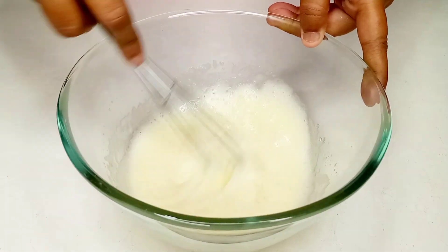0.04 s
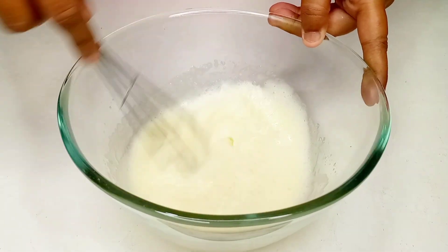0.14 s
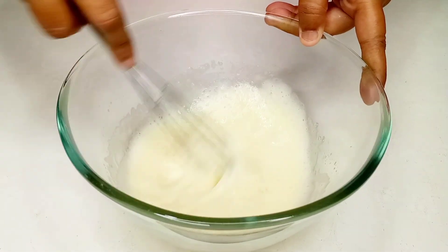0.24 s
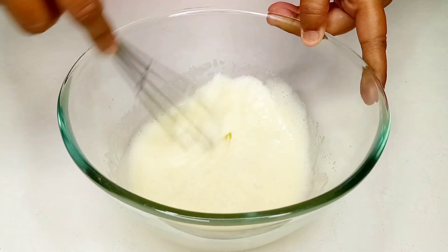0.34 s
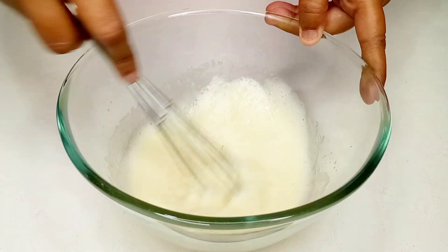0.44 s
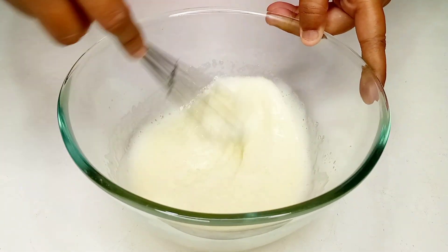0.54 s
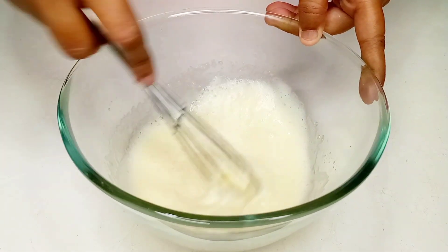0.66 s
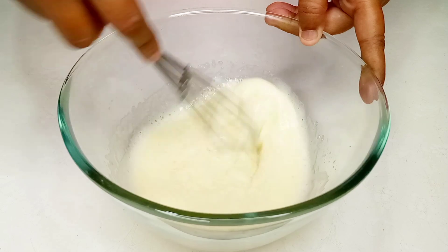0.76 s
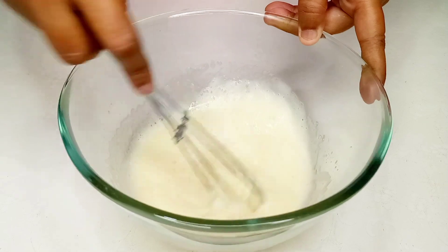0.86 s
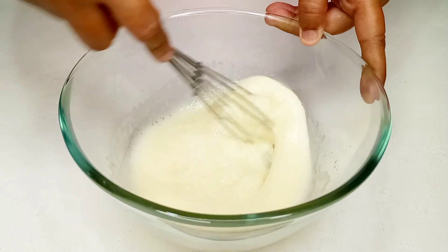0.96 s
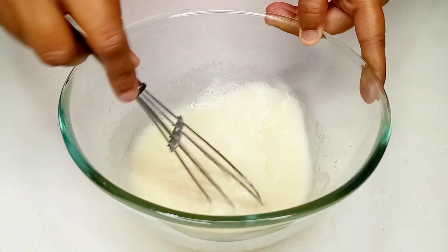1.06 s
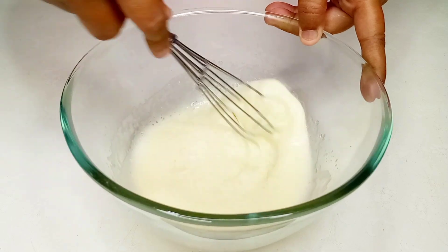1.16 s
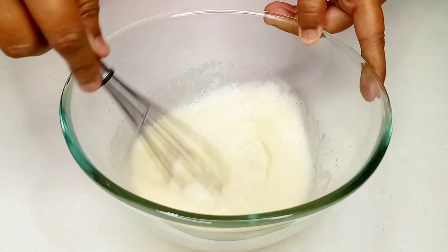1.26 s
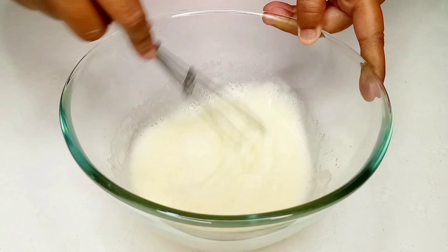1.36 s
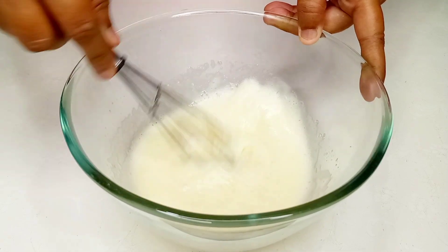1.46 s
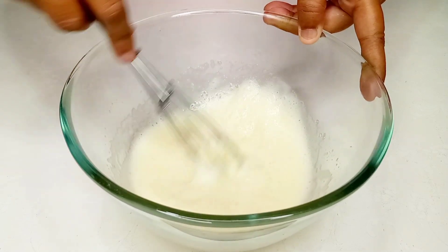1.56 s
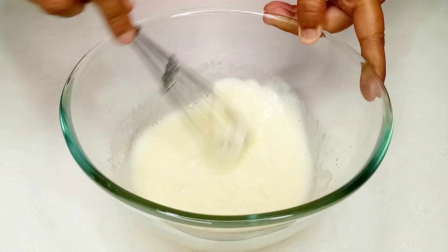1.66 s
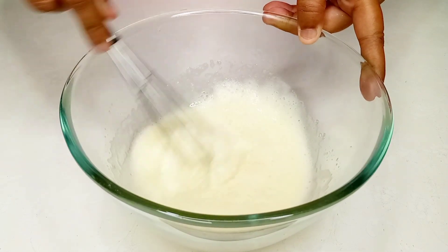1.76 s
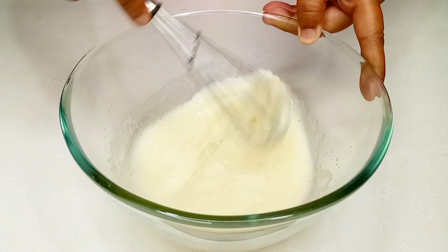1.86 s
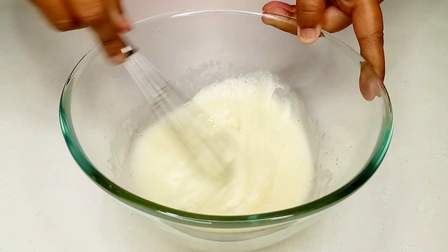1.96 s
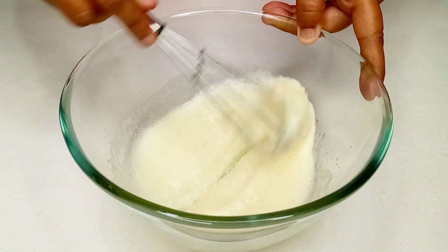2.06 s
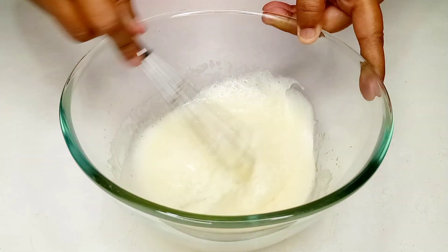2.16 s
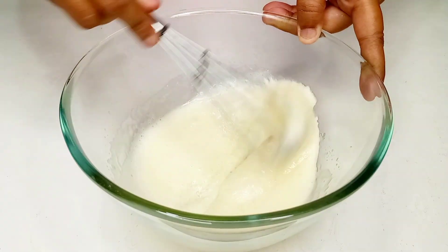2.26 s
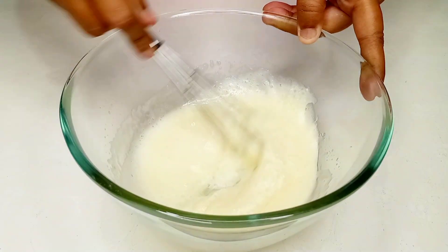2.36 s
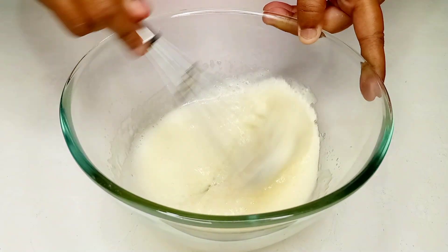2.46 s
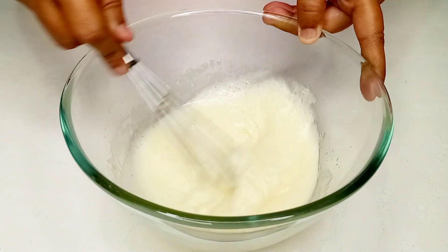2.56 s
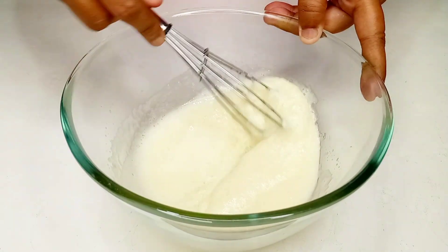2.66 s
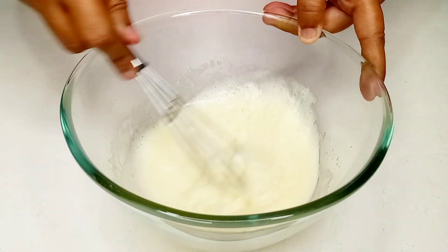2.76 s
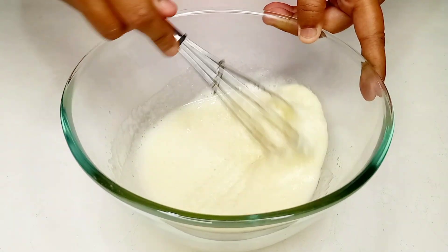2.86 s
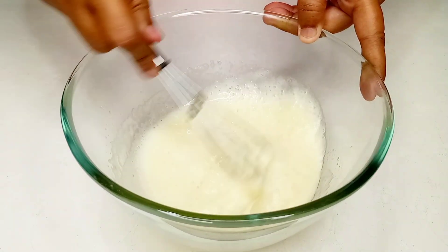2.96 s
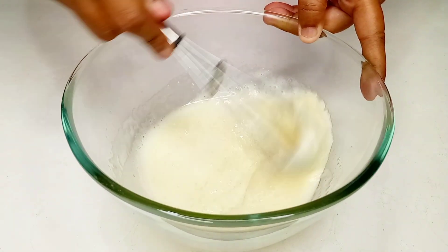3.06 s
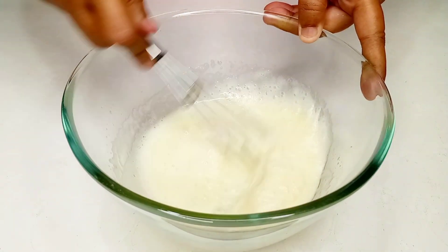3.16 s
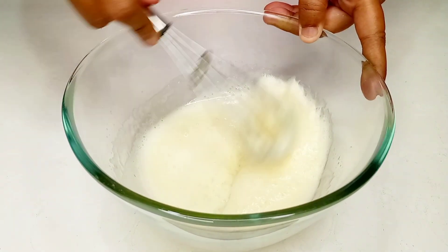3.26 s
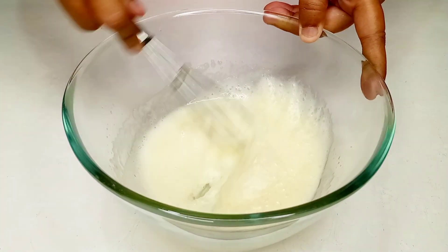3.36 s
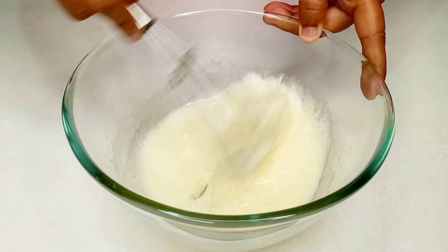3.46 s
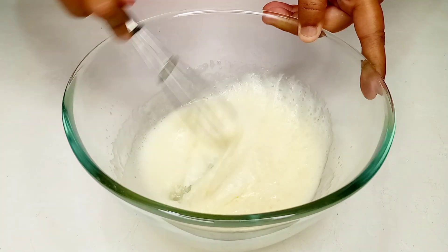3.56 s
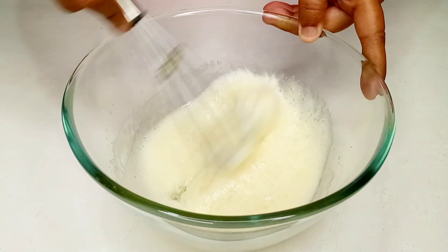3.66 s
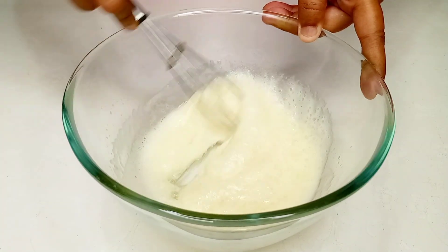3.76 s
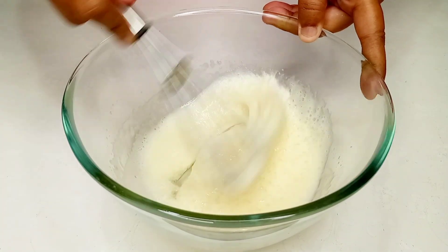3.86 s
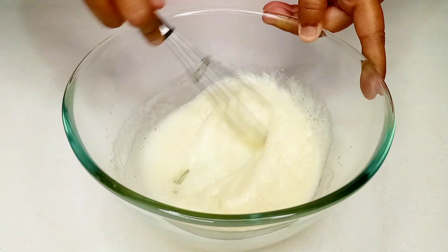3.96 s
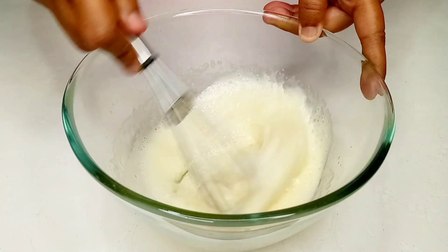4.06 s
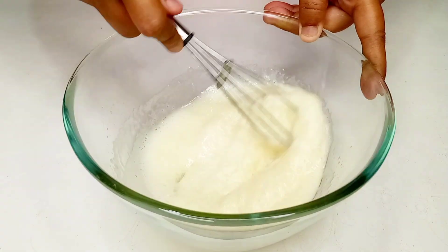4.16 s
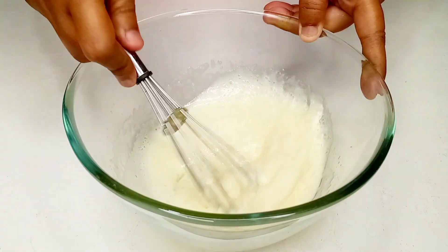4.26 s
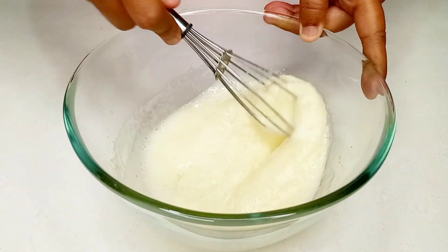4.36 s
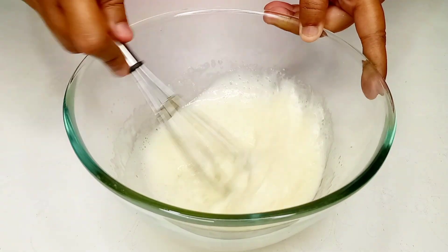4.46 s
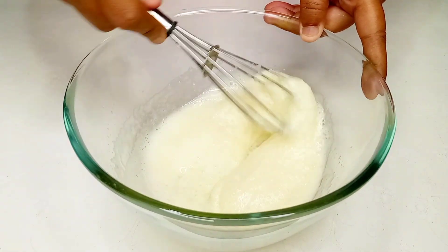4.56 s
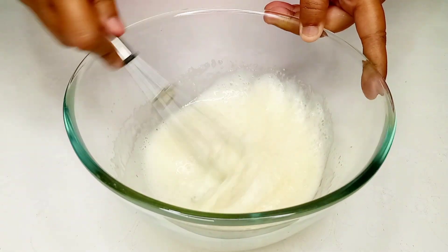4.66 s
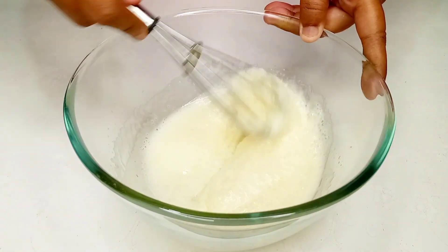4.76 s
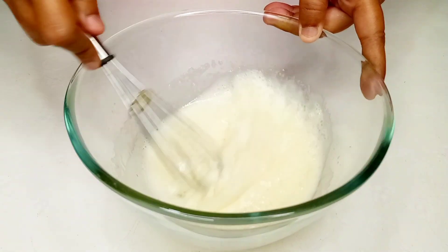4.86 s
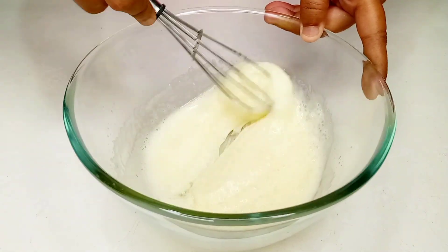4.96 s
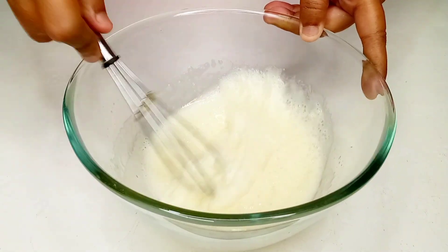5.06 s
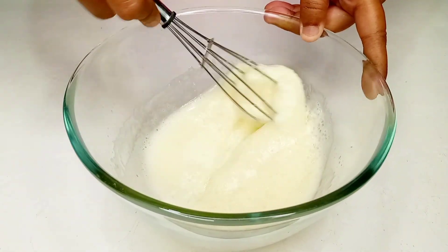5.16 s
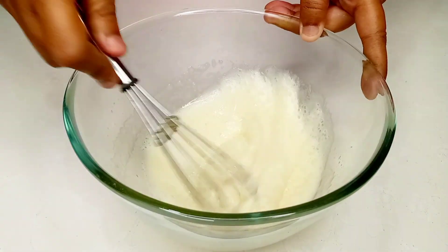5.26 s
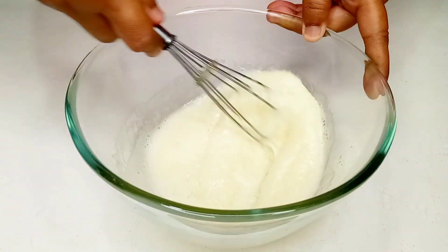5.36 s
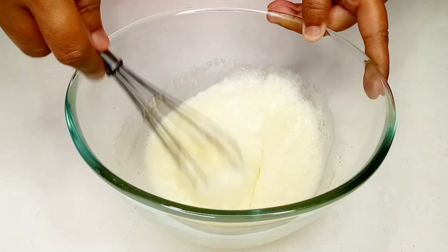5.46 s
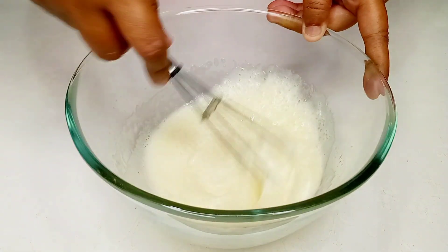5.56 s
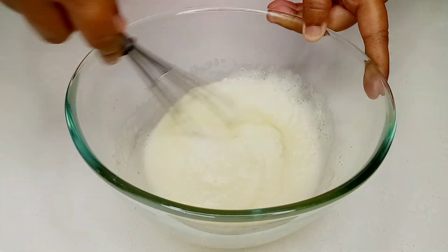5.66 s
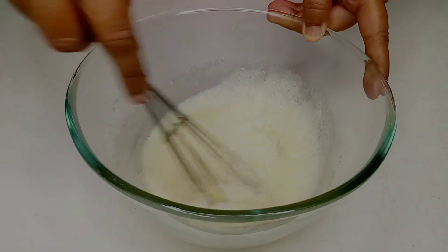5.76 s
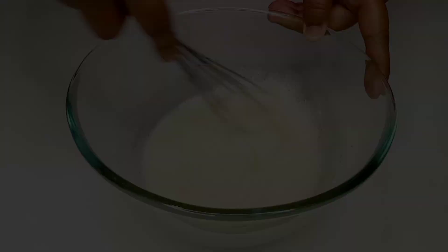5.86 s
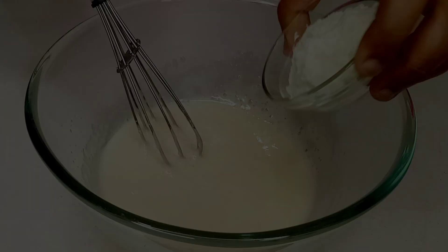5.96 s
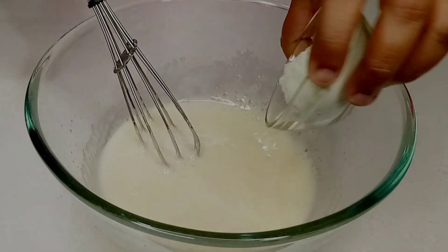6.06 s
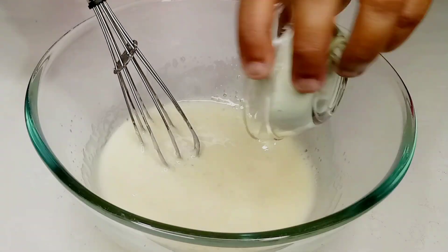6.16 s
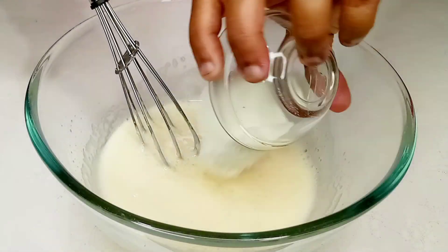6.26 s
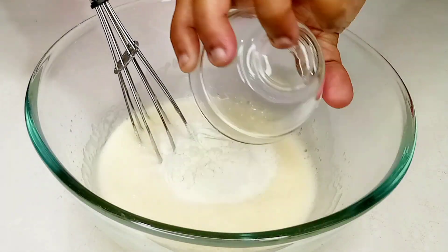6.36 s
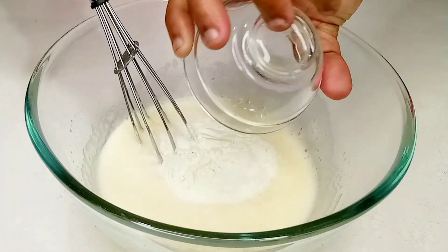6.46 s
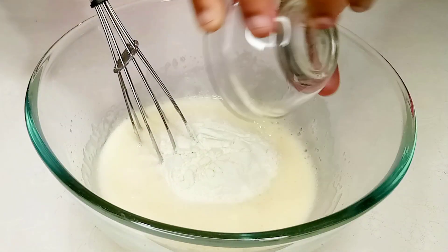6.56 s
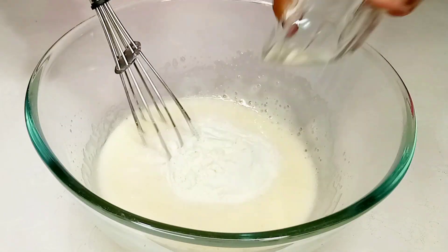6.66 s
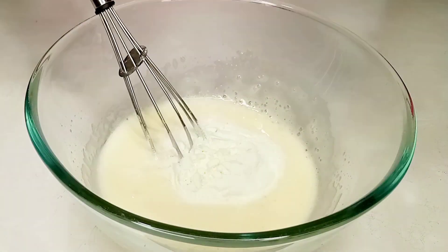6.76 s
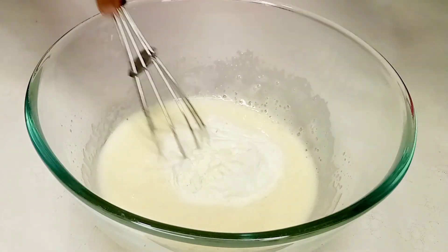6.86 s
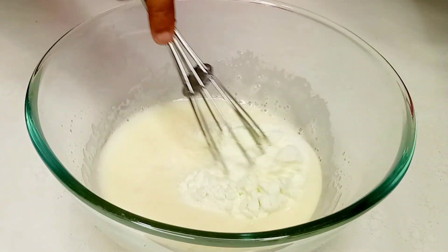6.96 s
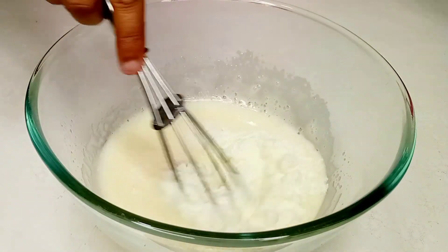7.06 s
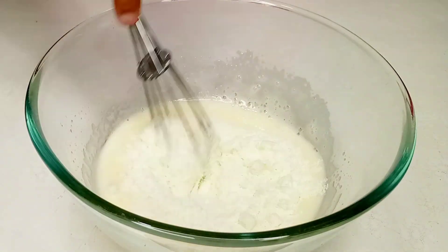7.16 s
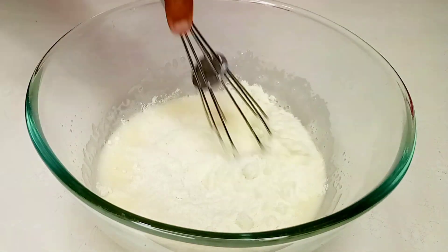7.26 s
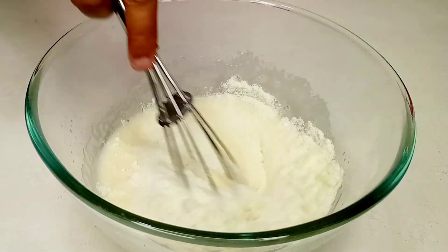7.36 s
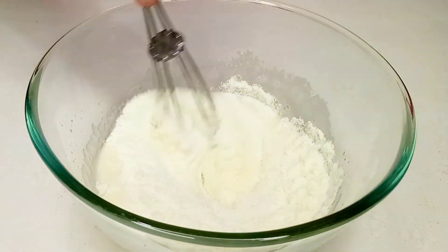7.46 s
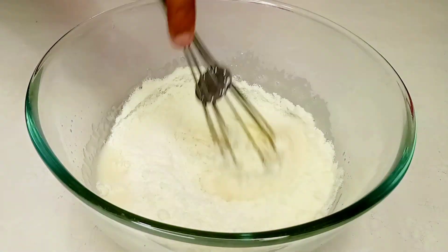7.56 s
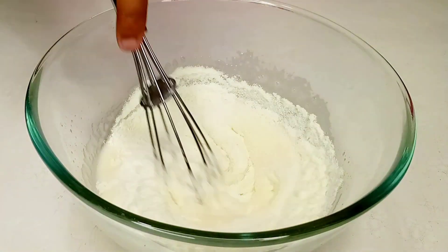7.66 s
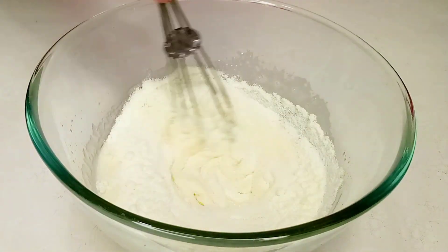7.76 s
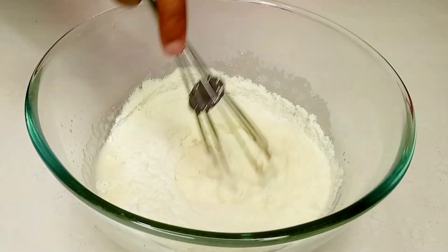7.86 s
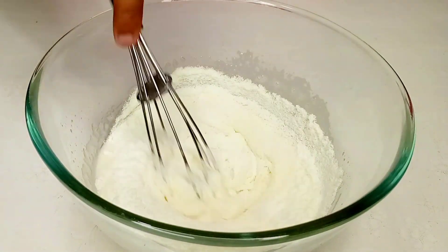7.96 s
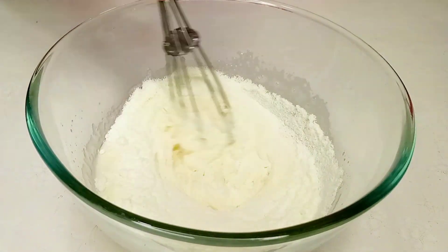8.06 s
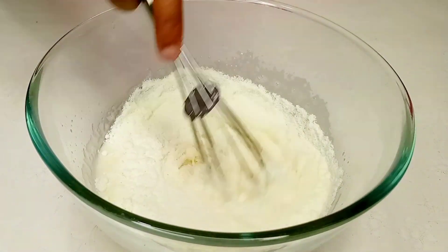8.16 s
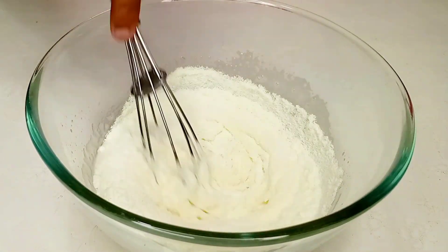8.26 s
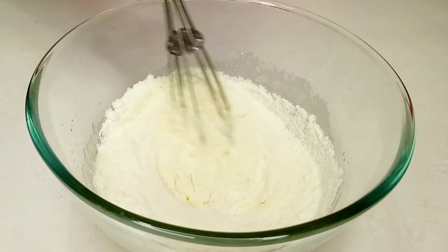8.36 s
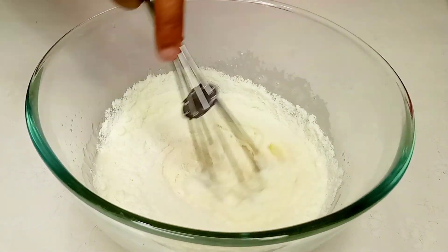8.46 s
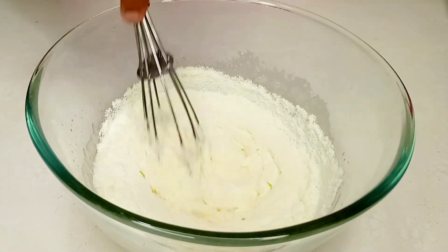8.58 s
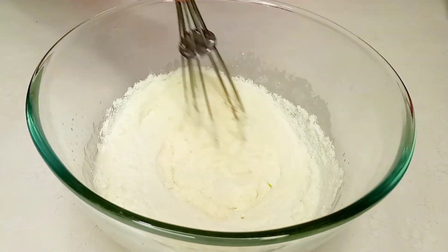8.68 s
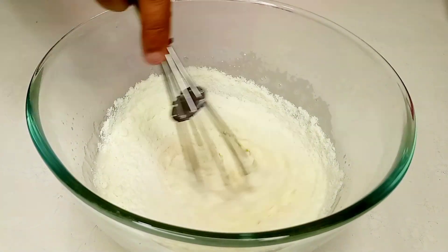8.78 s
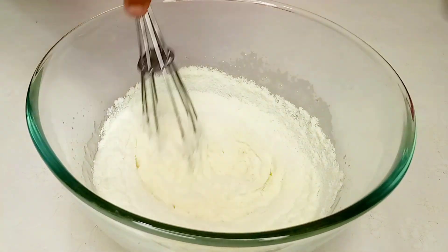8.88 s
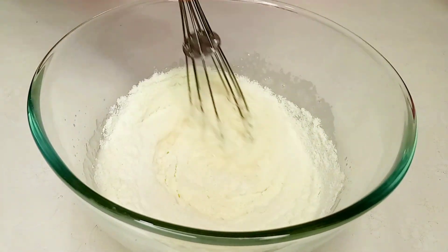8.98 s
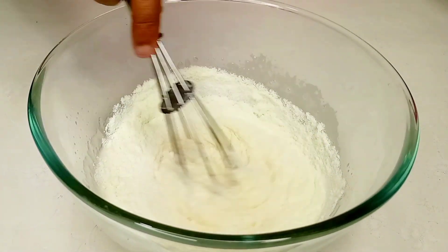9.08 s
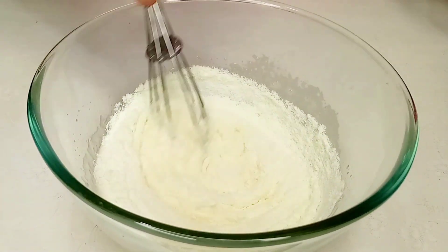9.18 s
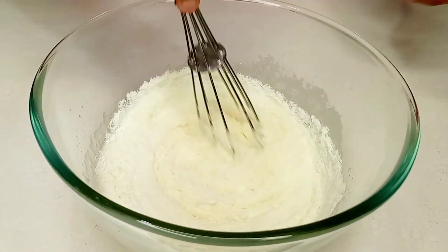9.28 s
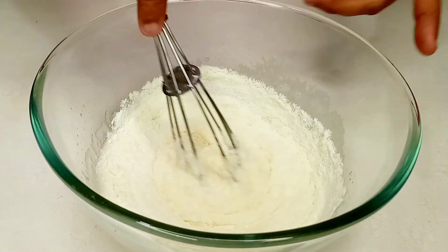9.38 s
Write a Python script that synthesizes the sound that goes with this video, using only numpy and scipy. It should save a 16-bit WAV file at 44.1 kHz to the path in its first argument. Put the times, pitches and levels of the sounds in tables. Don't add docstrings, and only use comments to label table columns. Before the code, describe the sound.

A wire whisk rattles round a glass bowl, then beats batter in steady sharp strokes, cuts to brief silence, and returns stirring softly through powder.

```python
import sys
import numpy as np
from scipy import signal
from scipy.fft import rfft, irfft
from scipy.io import wavfile

SR = 44100
rng = np.random.default_rng(int(sys.argv[2]) if len(sys.argv) > 2 else 0)


def how_loud(loudness_db):
    steps = np.asarray(loudness_db, float) / 20
    return 10 ** steps


def output_pcm(signal):
    pcm = np.clip(np.atleast_2d(signal).T, -1, 1) * 32767
    wavfile.write(sys.argv[1], SR, np.round(pcm).astype(np.int16))


N = 415422
TIME = np.arange(N) / SR
BEATING_START_S, STIRRING_START_S = 1.34, 6.18
STIRRING = TIME > STIRRING_START_S


def at_hz(points, hz):
    f, value = np.array(points).T[:2]
    return np.interp(np.log(hz), np.log(f), value)


def in_time(rows):
    s, *columns = np.transpose(rows)
    return [np.interp(TIME, s, column) for column in columns]


def rms_one(x):
    return x / np.sqrt(np.mean(x ** 2) + 1e-20)


def bandpass(x, low_hz, high_hz, order=2):
    return signal.sosfilt(signal.butter(order, [low_hz, high_hz], "band", fs=SR, output="sos"), x)


def highpass(x, hz, order):
    return signal.sosfilt(signal.butter(order, hz, "high", fs=SR, output="sos"), x)


def impulses(s, height):
    clicks = np.zeros(N)
    clicks[np.round(s * SR).astype(int)] = height
    return clicks


def drift(rate):
    r = np.exp(-80 * np.pi * rate / SR)
    noise = rng.standard_normal(N // 40 + 2002)
    slow = signal.lfilter([1], [1, -2 * r, r * r], noise)[2000:]
    return np.interp(np.arange(N) / 40, np.arange(len(slow)), rms_one(slow))


def ring(clicks, hz, t60):
    r, w = how_loud(-60 / (t60 * SR)), 2 * np.pi * hz / SR
    return signal.lfilter([0, np.sin(w)], [1, -2 * r * np.cos(w), r * r], clicks + 1e-18)


def coloured(x, spectrum):
    hz = np.maximum(np.fft.rfftfreq(2048, 1 / SR), 10)
    cepstrum = irfft(at_hz(spectrum, hz) * np.log(10) / 20)
    cepstrum[1:1024] *= 2
    cepstrum[1025:] = 0
    response = irfft(np.exp(rfft(cepstrum)))
    return signal.oaconvolve(x, response)[:len(x)]


def grains(per_s, spread_db):
    uneven = np.minimum(rng.exponential(1, N), 4)
    sizes = how_loud(spread_db * uneven) * rng.choice([-1, 1], N)
    return sizes * (rng.random(N) < per_s / SR)


def patchy(x, low_hz, count, patchy_db, rate):
    edges = low_hz * 2 ** (np.arange(count + 1) / 3)
    return sum(how_loud(patchy_db * drift(rate)) * bandpass(x, a, b) for a, b in zip(edges, edges[1:]))


def bursts(s, level_db, fall_s):
    t = np.arange(round(.15 * SR)) / SR
    out, chance = np.zeros(N + len(t)), rng.standard_normal((len(s), len(t)))
    for start, db, noise in zip(s, level_db, chance):
        run = noise * np.exp(-t / fall_s)
        i = round(start * SR)
        out[i:i + len(t)] += how_loud(db) * run / np.sqrt(np.sum(run ** 2))
    return out[:N]


def room_hiss():
    return how_loud(-96.5) * signal.lfilter([1], [1, -.9], rng.standard_normal(N))


# f/Hz, t60/s
KITCHEN_T60 = [(200, 0.23), (1000, 0.37), (4000, 0.1), (10000, 0.17), (16000, 0.055)]


def kitchen(x):
    t = np.arange(round(.5 * SR)) / SR
    noise, tail = rng.standard_normal(len(t)), 0
    for hz in 140 * 2 ** np.arange(7):
        band = bandpass(noise, hz, min(2 * hz, .45 * SR))
        tail = tail + band * how_loud(-60 * t / at_hz(KITCHEN_T60, np.sqrt(2) * hz))
    tail = tail * np.clip(t / 0.03, 0, 1)
    return signal.oaconvolve(x, tail / np.sqrt(np.sum(tail ** 2)))[:N]


# t/s, peak level/dB, thump level/dB, thin top/dB re peak
RATTLE = [(.002, -26, -28, -9), (0.0433, -47, -57, -20), (0.11, -46, -51, -10), (.772, -32, -31, 3),
          (1.0993, -42, -45, 3), (1.121, -53, -45, -26), (1.6102, -41.5, -43, -16),
          (0.0777, -30.5, -34, -17), (0.1263, -35, -32.5, 11), (0.145, -24, -26, 1.5),
          (0.2091, -27, -26.5, -17), (0.24, -30, -53, -20), (0.2931, -25, -32.5, -15), (0.348, -20, -26, 3),
          (0.4204, -25, -29.5, -1), (0.4351, -26, -33.5, -29), (0.5045, -51, -33.5, -23),
          (0.5245, -23, -29, -27), (0.5736, -25, -29, -4), (0.634, -26.5, -31, -26),
          (0.6805, -37, -29, -18), (.7112, -29, -39, -4), (0.841, -32.5, -36.5, -2),
          (0.874, -27, -33.5, -26), (0.934, -31, -35, -25), (0.964, -33, -59, -27), (0.987, -26, -29, 2.5),
          (1.048, -37, -55, -26), (1.158, -29, -34, -21), (1.1999, -20.5, -30, 2), (1.291, -24, -36.5, -45),
          (1.38, -31, -33.5, -27), (1.4361, -19, -24.5, -4), (1.5185, -30.5, -32.5, -26),
          (1.641, -42, -51, 2), (1.6702, -24, -37, 5.5)]
# t/s, peak level/dB, thump level/dB, brightest wire f/Hz, thin top/dB re peak
BEATS = [(1.7872, -21.5, -42, 4470, -26), (2.011, -20.5, -41, 3590, -9), (2.2041, -24.5, -29, 7200, -27),
         (2.4084, -14.5, -30.5, 3800, -28), (2.5933, -23, -27, 3660, -40), (2.7881, -20, -29.5, 7140, -44),
         (2.977, -23, -25.5, 4550, -26), (3.1613, -19, -29.5, 4500, -15), (3.3678, -13, -27.5, 6400, -17),
         (3.5566, -13.5, -24.5, 7460, -32), (3.7593, -8, -18.5, 3690, -37),
         (3.962, -12.5, -28.5, 3740, -23), (4.1479, -19.5, -33.5, 4700, -39),
         (4.3277, -17.5, -33, 4660, -33), (4.518, -14.5, -36, 7140, -14.5),
         (4.7072, -16.5, -33, 7140, -2.5), (4.8949, -15, -25, 7020, -4.5), (5.1001, -13.5, -31, 7300, -10),
         (5.2897, -11.5, -28.5, 3940, -30), (5.4812, -21, -30.5, 7000, 0), (5.641, -30, -35.5, 4500, 4)]
# t/s, peak level/dB, thump level/dB, thin top/dB re peak
GLANCES = [(2.0051, -36, -34, -1.5), (2.214, -20.5, -33, -26), (2.2728, -20, -49, 1.5),
           (2.463, -23, -39, -5), (2.581, -35, -45, -19), (2.6617, -24, -41, 1),
           (2.8547, -23.5, -38.5, -25), (3.03, -24, -51, -25), (3.049, -27.5, -36, -22),
           (3.2143, -26, -30, 1.5), (3.447, -27, -42, -21), (3.633, -22, -34, 1), (3.949, -41, -45, -21),
           (4.303, -43, -63, 2), (4.692, -58, -55, -13.5), (2.198, -34, -24, -14), (4.0196, -23.5, -34, -5),
           (4.2078, -25.5, -30, -27), (4.3886, -25.5, -35.5, 0), (4.583, -23, -25.5, -2),
           (4.7703, -18.5, -28.5, -1.5), (4.953, -16, -30, -22), (5.1677, -22.5, -31.5, 4.5),
           (5.371, -22.5, -29, -1), (5.553, -33, -40, -39), (5.6095, -36.5, -40, -2),
           (5.8022, -42, -48, -23), (5.8542, -39.5, -47, -14), (5.8884, -49, -57, -22.5)]
# t/s, peak level/dB, brightest wire f/Hz
TAPS = [(6.5296, -45, 7250), (6.576, -41, 3300), (6.6832, -42, 7250), (6.7276, -37, 3590),
        (6.9496, -45.5, 4430), (7.0194, -47, 7220), (7.2394, -48, 3820), (7.5433, -40.5, 7530),
        (8.1025, -55, 2590), (8.3958, -48.5, 4540), (8.9092, -43.5, 3180), (8.9885, -43, 3850),
        (9.0314, -42.5, 3730)]


def contacts_table():
    rattle = [(s, db, thump, top, thump - 16.5, 0) for s, db, thump, top in RATTLE]
    beats = [(s, db, thump, top, thump - 19.5, hz) for s, db, thump, hz, top in BEATS]
    glances = [(s, db, thump, top, thump - 22.5, 0) for s, db, thump, top in GLANCES]
    taps = [(s, db, db - 10.5, -6, db - 10.5 - 16, hz) for s, db, hz in TAPS]
    return np.array(rattle + beats + glances + taps)


# t/s, speed as hiss level/dB, pressure as rumble level/dB
BEATING = [(0, -62, -51.5), (.44, -52.5, -51), (1.0, -61, -53.5), (1.4, -55.5, -60), (1.78, -64, -77),
           (1.84, -48, -56.5), (2.0, -78, -70), (2.03, -60, -59), (2.48, -67.5, -63), (3.8, -61, -58),
           (5.2, -65, -55), (5.5, -63.5, -68), (5.75, -64.5, -87), (5.92, -100, -100)]
# t/s, length/s, speed as hiss level/dB, pressure as rumble level/dB
STIRS = [(6.05, 0.16, -90.5, -87), (6.174, 0.069, -67, -62), (6.236, 0.13, -93, -62.5),
         (6.276, 0.5, -66.5, -73.5), (6.48, 0.52, -61, -62.5), (6.727, 0.74, -62, -78),
         (6.97, 0.25, -78, -63.5), (7.148, 0.3, -61, -71), (7.265, 1, -68.5, -91),
         (7.531, 0.15, -61.5, -47.5), (7.634, 0.45, -69.5, -54), (7.826, 0.15, -67, -51),
         (7.935, 0.2, -69, -63), (8.037, 0.32, -64.5, -67), (8.24, 0.36, -71, -84.5),
         (8.357, 0.45, -65.5, -67.5), (8.631, 0.27, -69.5, -65.5), (8.906, 0.4, -59.5, -62.5),
         (9.15, 0.5, -61, -66.5)]


def hand():
    power = how_loud(2 * np.array(in_time(BEATING)))
    power = power + how_loud(2 * np.array([[-81], [-76]])) * STIRRING
    for s, length, *db in STIRS:
        u = (TIME - s) / length
        swell = np.clip(np.minimum(u / 0.19, (1 - u) / 0.6), 0, 1)
        power = power + how_loud(2 * np.array(db))[:, None] * swell ** 2
    speed_db, pressure_db = 10 * np.log10(power)
    phase = np.searchsorted([BEATING_START_S, STIRRING_START_S], TIME)
    rocking_db = pressure_db + np.array([-1, 2, -6])[phase]
    rocking_db = np.where(STIRRING, np.minimum(rocking_db, -75.5), rocking_db)
    return speed_db, pressure_db, rocking_db


def shaken(steady_db, strike_db, rise_s, t60, stop_s):
    kicks = impulses(contacts_table()[:, 0], how_loud(2 * strike_db))
    t = np.arange(round(.4 * SR)) / SR
    shudder = (1 - np.exp(-t / rise_s)) * how_loud(-120 * t / t60) * np.exp(-(t / stop_s) ** 3)
    return np.sqrt(how_loud(2 * steady_db) + np.maximum(signal.oaconvolve(kicks, shudder)[:N], 0))


# f/Hz, level/dB, t60/s
COUNTER = [(96, 2, 1), (127, 15, 0.12), (165.3, -0.5, 1), (225, -36.5, 0.067)]


def counter_boom():
    rocking = grains(200, spread_db=-5.0)
    boom = sum(how_loud(db) * ring(rocking, hz, 0.53 * t60) for hz, db, t60 in COUNTER)
    return bandpass(rms_one(boom), 55, 300)


# f/Hz, level/dB re pressure, t60/s
STIR_MODES = [(356, -3.5, 0.08), (521.4, -2.5, 0.064), (628.6, -4.5, 0.066)]


def bowl_rumble(coarse):
    rumble = bowl(coarse, damping=0.47, slosh_db=19.0, low_db=2)
    rumble = rms_one(patchy(rumble, 202.1, count=10, patchy_db=2.6, rate=10.5))
    circling = np.clip((BEATING_START_S - TIME) / 0.16, 0, 1)
    rumble = rumble + how_loud(0.5) * circling * rms_one(ring(coarse, 304.7, 0.12))
    grind = sum(how_loud(db) * rms_one(ring(coarse, hz, t60)) for hz, db, t60 in STIR_MODES)
    return np.where(STIRRING, how_loud(-4) * rumble + grind, rumble)


# f/Hz, width/Hz, level/dB
WIRES = [(3485, 52, 4.5), (4940, 180, -2), (4920, 130, 0), (6030, 41, -1), (7260, 30, 2), (7400, 27, 4.5),
         (7530, 150, -6.5), (8740, 28, -10.5), (9480, 230, 1)]
# f/Hz, level/dB per Hz
HISS = [(590, -37), (1000, -9.5), (1700, -21), (2600, -11.5), (4200, -1), (5700, -8), (7200, -0.5),
        (9500, -8.5), (11800, -16), (13600, -16), (14900, -18), (16000, -12.5)]
# f/Hz, level/dB per Hz
POWDER = [(530, -26), (900, -10.5), (1410, -9), (1900, -13.5), (2900, -10), (3700, -5.5), (4400, -0.5),
          (5300, -12.5), (6300, -3.5), (8450, -4.5), (11800, -22), (16000, -20.5)]


def wire_hiss(fine):
    wires = sum(how_loud(db + 4 * drift(8)) * rms_one(ring(fine, hz, 2.2 / width)) for hz, width, db in WIRES)
    scrape = np.where(STIRRING, rms_one(coloured(fine, POWDER)), rms_one(coloured(fine, HISS)))
    patchy_db = np.where(STIRRING, 1.7, 1.5)
    swish = patchy(scrape, 1000, count=12, patchy_db=patchy_db, rate=14)
    wires_db = -9.0 - 9 * STIRRING
    hiss = rms_one(rms_one(swish) + how_loud(wires_db) * rms_one(wires))
    loose_wires = rms_one(coloured(grains(210, spread_db=1.5), CRACK))
    return hiss + how_loud(-8.0) * loose_wires


def drag():
    hiss_db, rumble_db, boom_db = hand()
    _, peak_db, thump_db, top_db, thud_db, _ = contacts_table().T
    fine = rms_one(grains(15000, spread_db=2.5)) * how_loud(1.3 * drift(21))
    coarse = rms_one(grains(3000, spread_db=4.0)) * how_loud(2.1 * drift(6.3))
    tips = rms_one(bandpass(fine, 14300, 15800))
    splash = rms_one(bandpass(coarse, 750, 2840))

    shudder_db = np.minimum(peak_db, -13) - 21.0
    hiss_gain = shaken(hiss_db - .5, shudder_db, rise_s=0.0025, t60=0.3, stop_s=0.24)
    tips_db = hiss_db - 32.0 + 5.0 * drift(12)
    tips_gain = shaken(tips_db, peak_db + top_db - 30.5, rise_s=.002, t60=0.067, stop_s=.07)
    rumble_gain = shaken(rumble_db - .5, thump_db - 10.0, rise_s=0.032, t60=0.32, stop_s=0.11)
    splash_gain = shaken(rumble_db - 21.0, thump_db - 20.5, rise_s=0.0058, t60=0.2, stop_s=0.057)
    boom_gain = shaken(boom_db - .5, thud_db - 0.5, rise_s=0.0036, t60=0.44, stop_s=0.39)
    return (hiss_gain * wire_hiss(fine) + tips_gain * tips + rumble_gain * bowl_rumble(coarse)
            + splash_gain * splash + boom_gain * counter_boom())


# t/s, peak level/dB, f/Hz
TICKS = [(6.07, -69.5, 7230), (6.151, -72, 4400), (6.18, -46, 1240), (6.188, -46, 1430),
         (6.189, -48.5, 4500), (6.189, -55, 7200), (6.41, -53, 8500), (7.544, -46, 1520),
         (7.548, -50, 2280), (8.412, -53, 5900), (8.53, -59, 6700), (8.66, -49, 7500), (8.705, -57, 3660),
         (8.91, -57, 3150), (8.909, -52, 4200), (9.045, -54, 3520)]


def ticks():
    out = np.zeros(N)
    t = np.arange(64) / SR
    for s, db, hz in TICKS:
        click = np.zeros(4096)
        click[:64] = how_loud(db) * np.hanning(64) / 16 * np.sin(2 * np.pi * hz * t)
        out[round(s * SR):][:len(click)] += ring(click, hz, 68 / hz)
    return out


# f/Hz, level/dB, t60/s
GLASS = [(3779, -5, .17), (3735, -9, .07), (3830, -10, .06), (1374, -1, .3), (1520, -10, .2),
         (2457, -9, .38), (2436, -8, .12), (2490, -7, .07), (5400, -1, .2), (11600, -13, .13),
         (7820, -9, .12)]
# [1: 3.8, 2: 1.4, 3: 2.5, 4: 5.4, 5: 7.8 kHz]
DRIVEN_BY = [1, 1, 1, 2, 2, 3, 3, 3, 4, 4, 5]
# t/s, level/dB of the 3.8, 2.5 and 7.8 kHz modes
CLINKS = [
    (0.3512, -54, -37, -48),
    (2.2736, -52, -47, -47),
    (2.464, -48, -38, -48),
    (2.6845, -43, -60, -50),
    (3.558, -42, -47, -37.5),
    (5.2904, -28, -44, -22),
    (3.7594, -15.5, -28.5, -47.5),
]
# t/s, peak level/dB, sharpness/dB on its two top modes, 2.5 kHz mode/dB re peak
DISH = [
    (6.0693, -70.5, 4.5, -11),
    (6.151, -68, -16, -17),
    (6.188, -52, 3, -11),
    (6.199, -73, 3, 9.5),
    (6.3114, -73, -14, 2),
    (6.401, -78, -13, 14),
    (6.728, -53, -4, -6),
]
DISH_MODES_DB = [-11, -6, -1, -12, -15]


def rim():
    held = np.array([(s, a, a - 24, b, a - 22, c) for s, a, b, c in CLINKS])
    free = []
    for s, db, sharp_db, mid_db in DISH:
        modes_db = db + np.array(DISH_MODES_DB)
        modes_db[3:] += sharp_db
        modes_db[2] += mid_db
        free.append((s, *modes_db))
    free = np.array(free, float)
    out = np.zeros(N)
    for (hz, db, t60), column in zip(GLASS, DRIVEN_BY):
        bowl_clicks = impulses(held[:, 0], how_loud(held[:, column] + db))
        dish_clicks = impulses(free[:, 0], how_loud(free[:, column] + db))
        ringing = ring(bowl_clicks, hz, t60) + ring(dish_clicks, hz, 1.54 * t60)
        out += ringing * how_loud(2.5 * drift(70))
    return out


# t/s, level/dB of two counter modes and the two lowest bowl modes
SEATINGS = [(0.144, -53, -63, -49, -62), (0.344, -47, -50, -53, -45), (0.984, -55, -47, -47, -49),
            (1.198, -59, -63, -48.5, -51.5), (1.437, -40, -49, -60, -58), (1.67, -68, -59, -52, -71),
            (1.785, -45, -75, -57.5, -56), (2.011, -45, -48, -59, -48.5), (2.203, -39.5, -57, -49, -55),
            (2.408, -37.5, -50.5, -41, -46), (2.594, -51, -49, -50, -59), (2.658, -53, -45.5, -46, -62),
            (2.79, -50, -48, -62, -44), (2.854, -61, -57, -50.5, -45.5), (2.975, -67, -51, -54, -58.5),
            (3.16, -39.5, -46, -44.5, -45), (3.212, -62, -53, -66, -61.5), (3.364, -43, -53.5, -60.5, -54),
            (3.555, -49, -56, -42.5, -47.5), (3.63, -63, -52, -45.5, -56), (3.76, -53, -50, -42.5, -29.5),
            (3.961, -35, -43, -42, -52), (4.146, -37, -58, -56, -49), (4.207, -37, -48.5, -61, -46),
            (4.325, -39, -45, -50, -51), (4.517, -49, -73, -58, -46), (4.584, -44, -70, -44, -46),
            (4.707, -37.5, -71, -49, -40), (4.77, -42.5, -64, -55, -52.5),
            (4.894, -34.5, -47, -31.5, -33.5), (5.104, -35, -50, -53, -43), (5.164, -52, -45.5, -47, -50.5),
            (5.289, -41, -40, -44, -56), (5.37, -49, -42, -46.5, -47), (5.481, -60, -50, -58, -48)]
STIR_SEATINGS = [(6.182, -64, -75, -64, -63), (6.528, -78, -87, -69, -74), (6.727, -74, -60, -58, -59),
                 (6.997, -79, -75, -64, -76), (7.235, -74, -76, -79, -63), (7.541, -62, -60, -72, -53),
                 (7.834, -81, -74, -71, -58), (7.949, -78, -77, -80, -61.5), (8.097, -86, -85, -67, -54.5),
                 (8.414, -67, -65, -70, -83), (8.71, -74, -66, -65, -75), (8.911, -55, -63, -59, -72),
                 (9.034, -59, -70, -58, -78), (9.198, -78, -76, -61.5, -75)]
SEAT_HZ, SEAT_T60_S = [93, 166, 299, 361], [.33, .33, .24, .16]
SEAT_DB = [-2, 1, 6, 5.5]


def seatings():
    rows, out = np.array(SEATINGS + STIR_SEATINGS), np.zeros(N)
    push = np.hanning(round(0.024 * SR))
    t = np.arange(len(push)) / SR
    for k, (hz, db, t60) in enumerate(zip(SEAT_HZ, SEAT_DB, SEAT_T60_S)):
        clicks = impulses(rows[:, 0], how_loud(rows[:, k + 1] + db))
        swell = signal.oaconvolve(ring(clicks, hz, t60), push * np.cos(2 * np.pi * hz * t))
        out += 2 * swell[:N] / push.sum() * how_loud(2.8 * drift(17))
    return out


# f/Hz, level/dB, t60/s
BOWL = [(299, -4, 0.22), (362, -7, 0.15), (421, -11, 0.19), (523.7, 8, 0.11), (582.7, 1, 0.091),
        (634, -8.5, 0.11), (753, -5.5, 0.09), (922, -9, 0.13), (1016, -10, 0.11), (1120, -6, 0.05)]


def bowl(push, damping, slosh_db, low_db):
    modes = sum(how_loud(db + low_db * (hz < 400)) * ring(push, hz, damping * t60) for hz, db, t60 in BOWL)
    slap = bandpass(push, 270, 1100)
    return highpass(modes + how_loud(slosh_db) * slap, 230, order=4)


# t/s, peak level/dB, upper body/dB re peak
KNOCKS = [(3.768, -27.5, 10), (4.906, -18.5, -12), (6.187, -48, 6), (6.727, -32, -4), (7.0, -63, -13),
          (7.235, -62, -25), (8.415, -62, -5), (8.7, -54, -25), (9.27, -46, -25), (7.316, -55, -30),
          (7.543, -29.5, -5.5), (7.835, -38.5, -3.5), (7.88, -44, -4), (7.93, -49, -22), (8.1, -43.5, -3),
          (8.912, -43, -29), (8.989, -44, 0.5), (9.035, -43.5, -0.5), (9.409, -42, -18)]


def bottom_knocks():
    s, db, upper_db = np.transpose(KNOCKS)
    low = bowl(bursts(s, db - 15.0, fall_s=.014), damping=1.0, slosh_db=10, low_db=-3)
    upper = bursts(s, db + upper_db + 26.5, fall_s=.016)
    return low + bandpass(upper, 650, 1650, order=3)


# t/s, peak level/dB
BLOW_KNOCKS = [(0.144, -43), (0.293, -51), (0.347, -63), (0.421, -35), (0.573, -50), (0.683, -43.5),
               (0.984, -32), (1.197, -66), (1.435, -32), (1.674, -33.5), (1.787, -35.5), (2.012, -33.5),
               (2.214, -41), (2.271, -35.5), (2.409, -27), (2.595, -27.5), (2.658, -53), (2.788, -39.5),
               (2.978, -59), (3.161, -32), (3.365, -28), (3.555, -29.5), (3.631, -45), (3.756, -31),
               (3.964, -27), (4.149, -30), (4.325, -30.5), (4.521, -28), (4.704, -29), (4.897, -57),
               (5.099, -34), (5.289, -40), (5.37, -31.5), (5.481, -34.5)]
STIR_KNOCKS = [(6.528, -59), (6.728, -42), (6.999, -62), (7.234, -53.5), (7.319, -46), (7.544, -38.5),
               (7.695, -58), (7.834, -44), (7.879, -51), (8.101, -50), (8.414, -62), (8.697, -69),
               (8.749, -62), (8.912, -45.5), (8.988, -50), (9.269, -62)]
# f/Hz, level/dB, t60/s
KNOCK_MODES = [(526, 0, 0.2), (521, -12, 0.12), (596, -8.5, 0.15)]


def blow_knocks():
    s, db = np.array(BLOW_KNOCKS + STIR_KNOCKS).T
    clicks = impulses(s + .003, how_loud(db - 4.0))
    soft = signal.lfilter(np.hanning(40) / 20, 1, clicks)
    return sum(how_loud(db + 2.5 * drift(35)) * ring(soft, hz, t60) for hz, db, t60 in KNOCK_MODES)


def thump():
    s, _, thump_db = contacts_table().T[:3]
    push = bursts(s + 0.001045, thump_db - 16.5, fall_s=.006)
    return bowl(push, damping=0.82, slosh_db=37, low_db=-6.5)


# f/Hz, level/dB per Hz
CRACK = [(410, -37.5), (700, 4.5), (1770, -10), (3600, 1.5), (5920, -3.5), (7110, 2.5), (7690, -5.5),
         (8310, -2), (13700, -22), (15000, 2), (16000, -30.5)]
BRIGHT_HZ = [3660, 4500, 4700, 7630, 7140]


def cracks(fall_s, wire_t60, wire_db):
    lead_s = .03
    t = np.arange(round(.08 * SR)) / SR - lead_s
    rows = contacts_table()
    out, chance = np.zeros(N + 2 * len(t)), rng.standard_normal((len(rows), len(t)))
    any_wire = rng.choice(BRIGHT_HZ, len(rows))
    for (s, db, _, top_db, _, hz), noise, other in zip(rows, chance, any_wire):
        wire_hz = hz or other
        swell_s = np.clip(0.0028 * how_loud(3.3 * top_db), .0003, .008)
        first_loops = how_loud(-10.5) * np.exp(-np.abs(t) / 0.0022)
        skid = how_loud(min(top_db, 0) - 25.0) * (t < 0) * np.clip(1 + t / 0.047, 0, 1)
        envelope = np.exp(np.minimum(t / swell_s, -t / fall_s)) + first_loops + skid
        contacts = envelope * noise * np.abs(noise)

        leaning = [(f, d - 2 * abs(np.log2(f / wire_hz))) for f, d in CRACK]
        body = rms_one(coloured(contacts, leaning))
        wire = rms_one(ring(contacts, wire_hz, wire_t60))
        squeal = rms_one(bandpass(contacts, 14100, 15400))
        thin = rms_one(highpass(contacts, 11000, order=4)) + how_loud(-5) * squeal
        this_wire_db = wire_db + 0.5 * (s > STIRRING_START_S)
        strike = body + how_loud(this_wire_db) * wire + how_loud(top_db - 3.5) * thin
        i = len(t) + round((s + .001 - lead_s) * SR)
        out[i:i + len(t)] += how_loud(db - 24.5) * strike
    return out[len(t):len(t) + N]


def strikes():
    crack = cracks(fall_s=0.0035, wire_t60=0.039, wire_db=-6.5)
    return crack + thump() + blow_knocks() + bottom_knocks() + seatings()


def scene():
    hits = strikes()
    return (room_hiss() + how_loud(-10.5) * kitchen(hits) + drag() + ticks() + rim() + hits)[None]


def band_limit(x):
    return signal.sosfilt(signal.butter(12, 16990, fs=SR, output="sos"), x)


# t/s, level/dB
FADE = [
    (0, 0),
    (5.9, -2),
    (5.935, -22),
    (5.945, -93.5),
    (6.06, -94.5),
    (6.068, 2),
    (9.42, 0.5),
]


def record(dry):
    x = highpass(dry, 70, order=3)
    x = signal.sosfilt(signal.cheby2(8, 22, 16100, fs=SR, output="sos"), x)
    mix = x * how_loud(in_time(FADE)[0])
    return band_limit(mix)


dry = scene()
out = record(dry)
output_pcm(out)
```